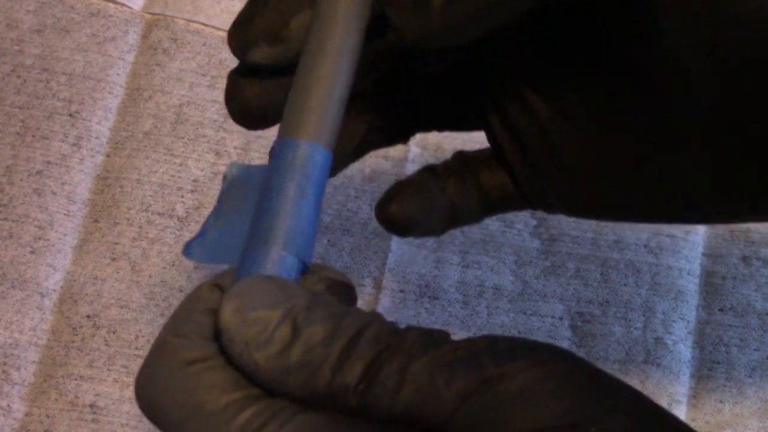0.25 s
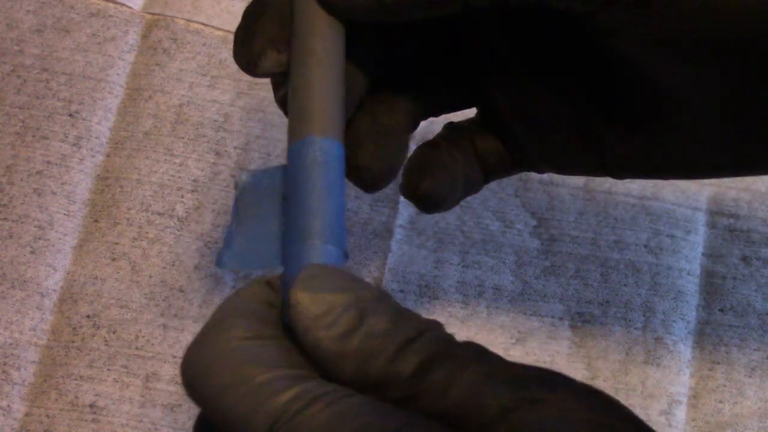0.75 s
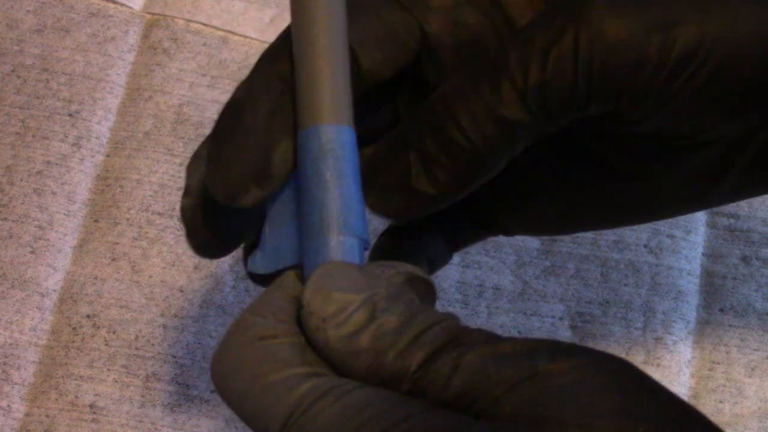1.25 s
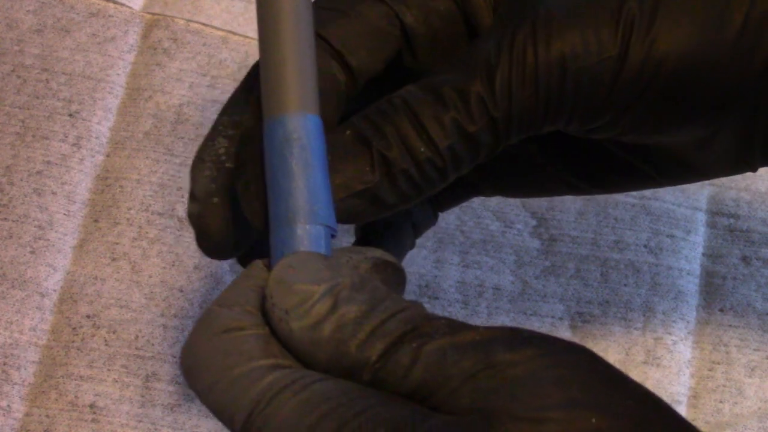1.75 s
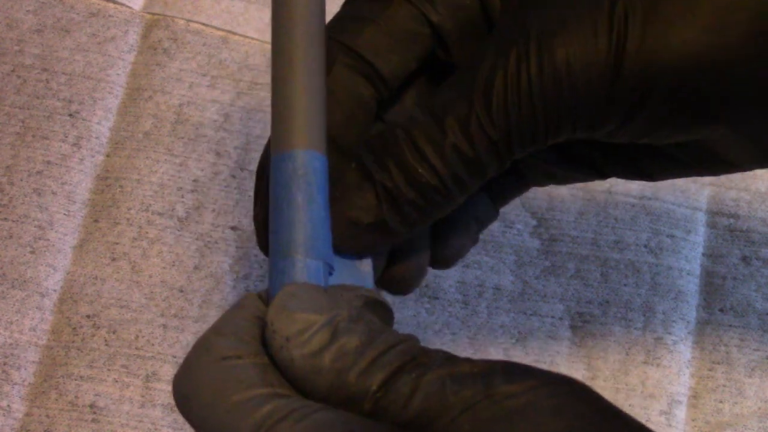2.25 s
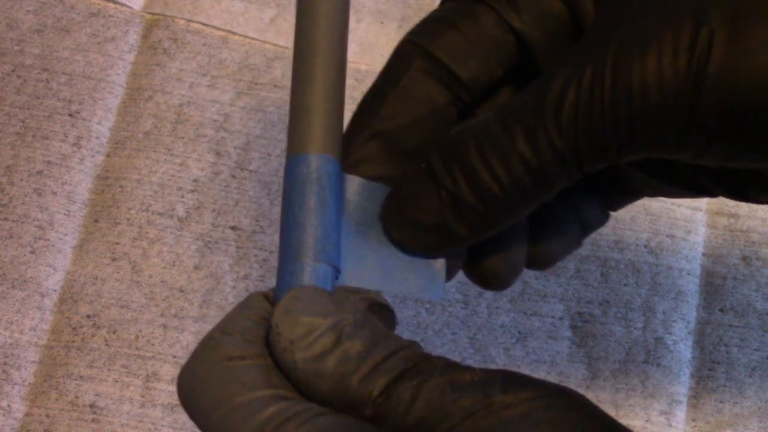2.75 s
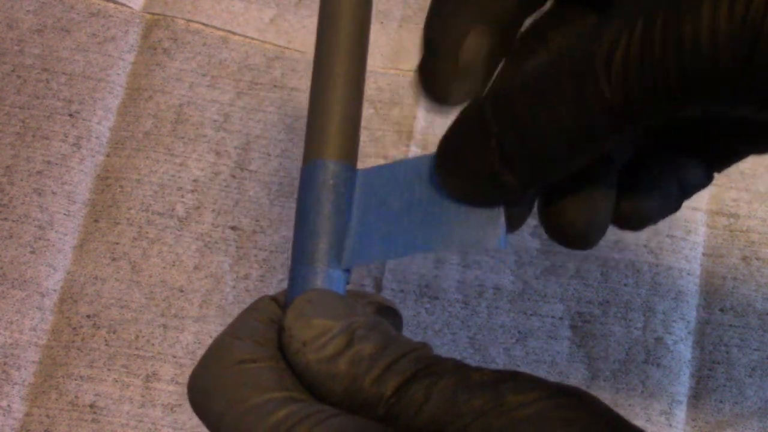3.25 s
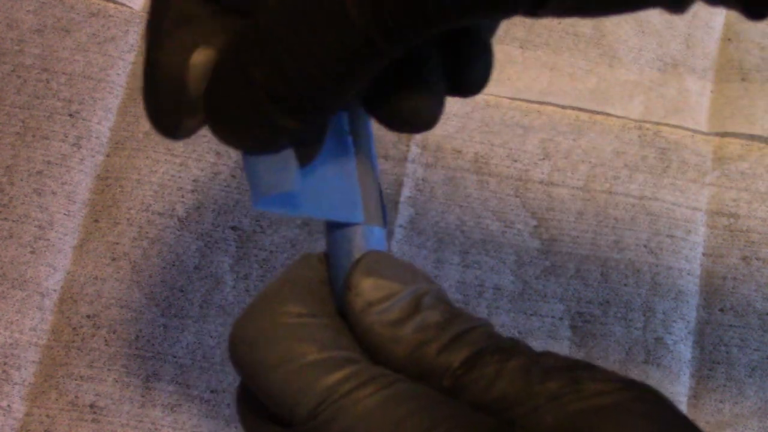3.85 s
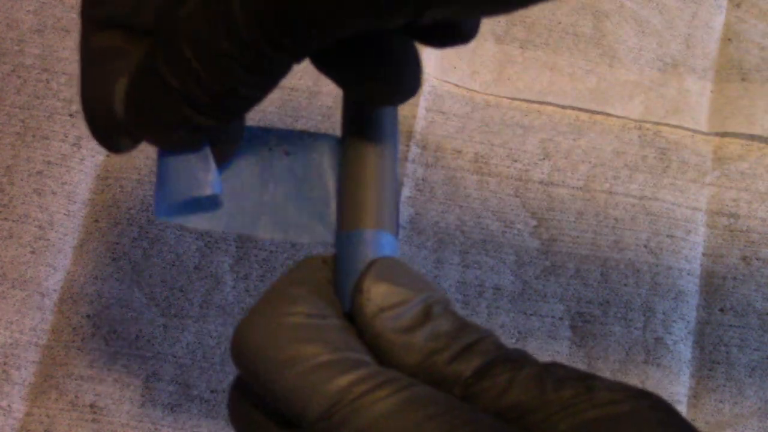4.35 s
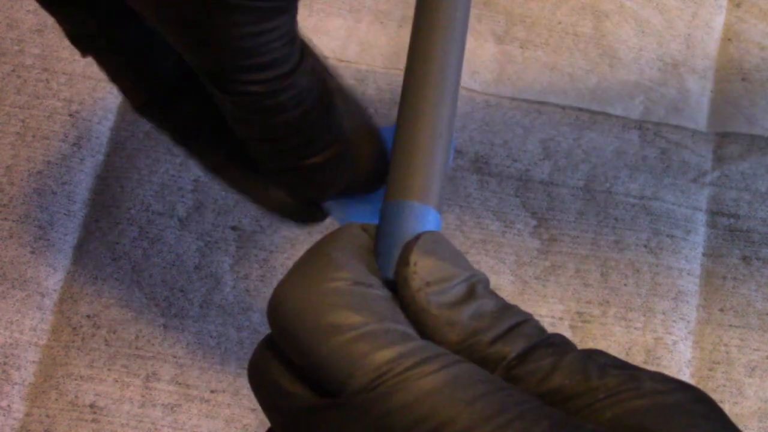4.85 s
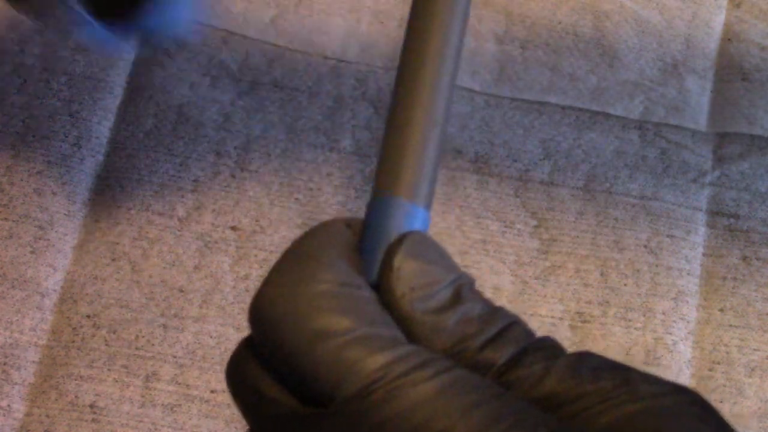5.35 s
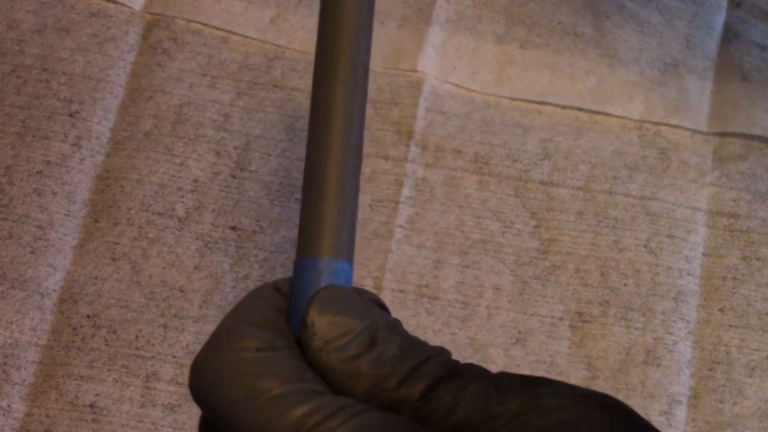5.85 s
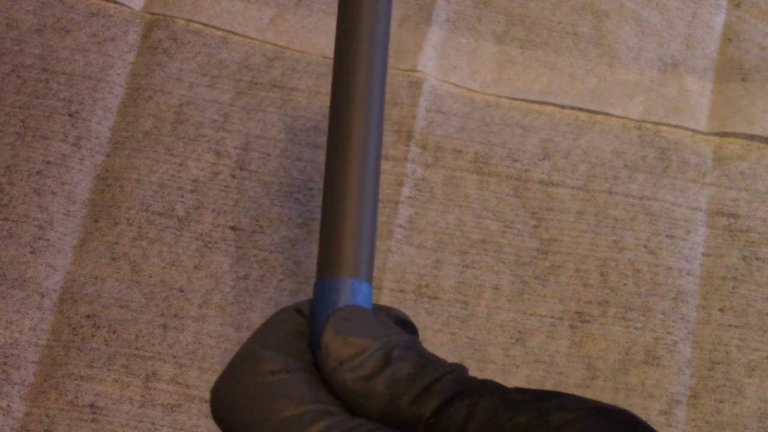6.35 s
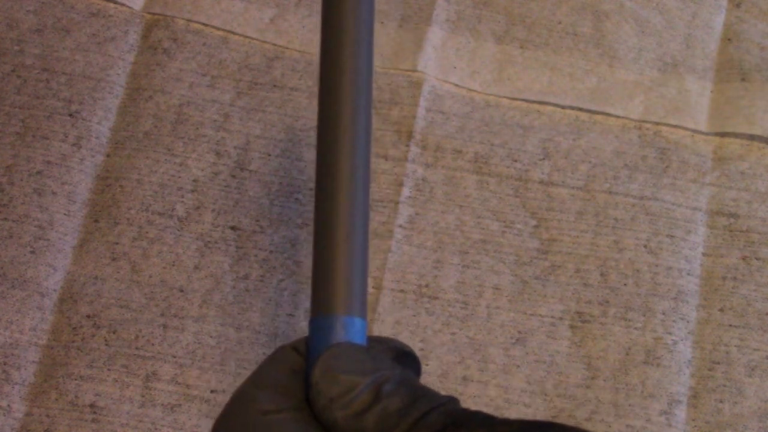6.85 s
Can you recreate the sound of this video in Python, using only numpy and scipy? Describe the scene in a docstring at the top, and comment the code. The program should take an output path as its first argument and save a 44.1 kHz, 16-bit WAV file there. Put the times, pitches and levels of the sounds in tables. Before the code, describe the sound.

Very close handling in a small, dry indoor space: gloves brush lightly, then adhesive paper tape peels in brief dry rips of tiny glue pops, punctuated by bright clicks. The strongest snaps come as it comes loose, followed by crinkles and a few isolated cracks. Late soft rubbing and low bumps end it. Quiet ventilation rushes steadily underneath, with a faint hum.

```python
"""Steady ventilation noise and rustling gloves, then painter's tape unwound from a metal rod close by.
Dense tiny glue pops ring the modes of the taut paper strip; it ticks, rips and snaps as it buckles.
It comes free and is crumpled aside with soft bumps; a small dry room answers with a short dense tail.
Pops are random impulses and cracks are splintering kicks, both through resonators; rubs, air and bumps
are filtered grains and noise."""
import sys
import numpy as np
from scipy import signal
from scipy.fft import rfft, irfft
from scipy.io import wavfile
from scipy.ndimage import uniform_filter1d

SR = 44100
rng = np.random.default_rng(int(sys.argv[2]) if len(sys.argv) > 2 else 0)


def dump(signal):
    """Clip the signal to [-1, 1] and save it as 16-bit WAV at the path in sys.argv[1]."""
    limited = np.clip(np.atleast_2d(signal).T, -1, 1)
    pcm = np.round(limited * 32767).astype(np.int16)
    wavfile.write(sys.argv[1], SR, pcm)


N = 313110
TIME = np.arange(N) / SR


def undb(db):
    """Decibels to gain."""
    return 10 ** (np.asarray(db) / 20)


def unit(x):
    """Scale to rms 1."""
    return x / np.sqrt(np.mean(x ** 2) + 1e-20)


def add(track, start_s, sound):
    """Mix a sound into a track, cut at the track's end."""
    start = int(np.clip(start_s * SR, 0, N - 1))
    track[start:start + len(sound)] += sound[:N - start]


def colour(x, points):
    """Shape a spectrum by (Hz, dB) points, joined by straight lines over log frequency."""
    hz, db = np.transpose(points)
    bins_hz = np.maximum(np.fft.rfftfreq(len(x), 1 / SR), 1)
    gain_db = np.interp(np.log(bins_hz), np.log(hz), db)
    return irfft(rfft(x) * undb(gain_db), len(x))


def band(x, lo_hz, hi_hz, order=3):
    """Butterworth band-pass."""
    edges_hz = [lo_hz, min(hi_hz, SR / 2 - 100)]
    return signal.sosfilt(signal.butter(order, edges_hz, "band", fs=SR, output="sos"), x)


def ring(x, hz, q):
    """One damped resonance, gain 1 at its centre."""
    b, a = signal.iirpeak(min(hz, SR / 2 - 1000), max(q, 1), fs=SR)
    return signal.lfilter(b, a, x)


def walk(per_s):
    """Random levels held briefly and smoothed twice; spread near 1."""
    hold = int(SR / per_s)
    steps = np.repeat(rng.standard_normal(N // hold + 1), hold)
    return 1.25 * uniform_filter1d(uniform_filter1d(steps, hold), hold)[:N]


def pops(size, per_s, spread_db):
    """Tiny impulses at random moments, of random sign and very unequal strength."""
    hits = rng.random(size) < per_s / SR
    strength = undb(spread_db * np.clip(rng.standard_normal(size), -2, 2))
    return hits * strength * rng.choice([-1, 1], size)


def crackle(per_s, spread_db):
    """Endless pops, levelled to near-equal energy over every few hundredths of a second."""
    x = pops(N, per_s, spread_db)
    power = np.abs(uniform_filter1d(x ** 2, size=1500))
    return x / np.sqrt(power + 1e-6)


def fracture(splinter_db, splinter_s, size=1024):
    """One sharp release, trailed by a moment of splintering fibres."""
    t = np.arange(size) / SR
    fade = np.exp(-t / splinter_s)
    x = undb(splinter_db) * rng.standard_normal(size) * fade * (1 - fade)
    x[0] = 1
    return x


def ventilation():
    """Steady rush of air with two duct resonances, a low hum and a thin whine."""
    # Air spectrum. Each row: frequency in Hz, relative density in dB.
    air = [(25, -16.5), (60, -12.5), (110, -3), (190, -0.5), (400, 1), (800, -3.5), (1250, -7.5),
           (2000, -8.5), (3000, -12), (5000, -16.5), (9500, -21), (15000, -30)]
    # Duct resonances. Each row: centre in Hz, width in Hz, gain in dB.
    duct_modes = [(983, 140, -6.5), (1508, 144, 1.5)]
    # Stereo width of the air. Each row: frequency in Hz, side gain in dB.
    air_side = [(28, -1), (75, -9), (240, -7), (620, -7.5), (1550, -7.5), (5100, -10), (15100, -25)]
    # Faint steady tones. Each row: frequency in Hz, rms level in dB.
    hums = [(184.5, -77.5), (5575, -86.5)]
    rush_db = -60.5
    mid, side = (colour(rng.standard_normal(N), air) for _ in range(2))
    mid = mid + sum(undb(db) * ring(mid, hz, hz / width_hz) for hz, width_hz, db in duct_modes)
    rush = unit(mid) + colour(unit(side), air_side) * np.array([[1], [-1]])
    tones = sum(undb(db) * np.sqrt(2) * np.sin(2 * np.pi * hz * TIME) for hz, db in hums)
    return (rush * undb(rush_db) + tones) * undb([[.4], [-.4]])  # slightly left


def rustle():
    """Gloves and slack tape rub in fine grains; each stroke swells and fades like a bell curve."""
    # Grain spectrum. Each row: frequency in Hz, gain in dB.
    grain_colour = [(1000, -6.5), (2700, -7), (4400, -11), (5500, -8.5), (6500, -3), (8100, -9),
                    (9500, -12), (12500, -14), (16000, -8)]
    # Strokes of glove on rod and loose tape. Each row: middle in seconds, length in seconds (between
    # the 1/e points), treble level in dB, middle band in dB re treble.
    rubs = [(0.177, 0.08, -68, 3), (0.378, 0.027, -67, -10), (0.52, 0.028, -70, -2),
            (0.686, 0.041, -67, -2), (1.035, 0.15, -67.5, -7), (1.277, 0.057, -61, -2),
            (5.04, 0.14, -55.5, -5), (5.262, 0.026, -57, 1), (5.407, 0.075, -61.5, 0.5),
            (5.586, 0.22, -64, -1.5), (5.855, 0.023, -64.5, 6), (6.416, 0.023, -63, -12),
            (6.757, 0.076, -50, -17), (6.837, 0.051, -51.5, -7), (6.973, 0.13, -55, -14),
            (7.01, 0.098, -55.5, 0)]
    grip_db = -74.5  # the gloves never quite stop moving
    grains = colour(crackle(per_s=2000, spread_db=6.5), grain_colour)
    treble = unit(band(grains, 3060, 11700))
    middle = unit(band(grains, 1480, 5900))
    out = (treble + middle) * undb(grip_db + 1.97 * walk(per_s=12))
    for middle_s, length_s, db, middle_db in rubs:
        bell = np.exp(-(2 * (TIME - middle_s) / length_s) ** 2)
        out += undb(db) * bell * (treble + undb(middle_db) * middle)
    return out


def rips():
    """Quick runs of pops swell and die as a patch of tape tears or crumples, or a glove squeaks; each run rings
    one narrow pitch."""
    # Each row: start in seconds, length in seconds, rms level in dB, ring in Hz, ring over crack in dB.
    runs = [(0.979, 0.069, -61, 2730, 20), (2.113, 0.0076, -53, 1400, 37), (3.054, 0.0056, -51, 2660, 16),
            (3.106, 0.025, -49.5, 905, 21), (3.151, .023, -52, 2750, 7), (3.214, 0.033, -56, 6170, 0),
            (3.807, .006, -54.5, 2180, 27), (4.009, 0.0061, -42.5, 1510, 10.5),
            (4.077, 0.018, -47, 9100, 1), (4.135, 0.019, -44, 6300, 15), (4.838, 0.0075, -41, 2570, 4),
            (4.843, 0.035, -49, 7700, 2), (4.879, 0.033, -44.5, 4840, 20), (5.487, 0.031, -49, 1680, 14),
            (5.956, 0.017, -37, 2460, 8.5), (5.971, 0.0074, -40.5, 9250, 4), (6.254, 0.037, -63, 3860, 11),
            (6.724, 0.077, -53.5, 6900, 9), (6.766, 0.0053, -46.5, 1150, 14)]
    out = np.zeros(N)
    for start_s, length_s, db, hz, ring_db in runs:
        size = max(int(length_s * SR), 64)
        run = pops(size, per_s=9400, spread_db=3.5) * signal.windows.tukey(size, .5)
        crack = band(run, 720, 8000, order=2)
        fold = ring(ring(run, hz, q=2.5), hz, q=2.5)
        add(out, start_s, unit(crack + undb(ring_db) * fold) * undb(db))
    return out


def pull(length_s, swell_db):
    """Gain of one pull: a quick attack, a steady swell or sag as the hand moves, a quick release."""
    attack_s, release_s = 0.022, 0.01  # the glue starts to give; the crackle dies when the hand stops
    t = TIME[:SR // 2]
    attack = np.clip(t / attack_s, 0, 1)
    swell = undb(swell_db * (np.clip(t / length_s, 0, 1) - .5))
    release = np.exp(-np.maximum(t - length_s, 0) / release_s)
    return attack * swell * release


def peel():
    """Glue pops ring the strip; tension shifts weight from body to treble, free length tints each pull."""
    # Resonances of the taut strip. Each row: centre in Hz, width of each of two passes in Hz, gain in dB.
    strip_modes = [(910, 480, -10.5), (1540, 400, -2), (2535, 640, 8), (3580, 1070, 2.5), (4680, 410, 3),
                   (6060, 1470, 1.5), (7500, 1150, -3.5), (9500, 3800, 0.5), (14400, 3700, -11)]
    # Pulls on the strip. Each row: start in seconds, length in seconds, treble halfway in dB, swell from
    # start to end in dB, slack as body in dB re treble, ring of the free length in Hz.
    hand_pulls = [(2.07, 0.13, -74, -1, 11, 6200), (2.248, 0.19, -60.5, -1, -4, 6100),
                  (2.477, .27, -65.5, 8, 7.5, 6700), (2.729, 0.32, -62, 7.5, -10, 8500),
                  (3.033, 0.074, -53.5, 11, -2.5, 8400), (3.123, 0.18, -59.5, 2, -3, 6200),
                  (3.32, .17, -63.5, 1, -7, 10400), (3.499, 0.069, -61.5, 0, -0.5, 6000),
                  (3.59, 0.35, -73, -7, 4, 9600), (3.929, .13, -58, 8.5, 0, 9300),
                  (4.062, 0.082, -51.5, -1, -6.5, 9350), (4.175, 0.12, -64, 5, -4, 9000),
                  (4.375, 0.12, -63, 6, -6.5, 6200), (4.544, 0.33, -62.5, 4, -4, 6200)]
    middle_base_db, middle_per_slack = 2, 0.7  # middle re treble, and its dB per dB of slack
    free_length_db, free_length_q = 1, 6.6
    glue = crackle(per_s=1900, spread_db=7.5) * undb(2.0 * walk(per_s=140))
    strip = np.zeros(N)
    for hz, width_hz, db in strip_modes:
        # each pop sits on a crest or a trough of this mode; the creeping peel line favours modes in turn
        push = glue * rng.choice([-1, 1], N) * undb(1.6 * walk(per_s=22))
        q = hz / width_hz
        strip += undb(db) * ring(ring(push, hz, q), hz, q)
    bands = np.array([unit(band(strip, 5260, 17000)), unit(band(strip, 1720, 4300)),
                      unit(band(strip, 500, 1750))])
    out = np.zeros(N)
    for start_s, length_s, db, swell_db, slack_db, hz in hand_pulls:
        gain = undb(db) * pull(length_s, swell_db)
        treble, middle, body = bands[:, int(start_s * SR):][:, :len(gain)]
        treble = unit(treble + undb(free_length_db) * ring(treble, hz, free_length_q))
        middle_db = middle_base_db + middle_per_slack * slack_db
        add(out, start_s, gain * (treble + undb(middle_db) * middle + undb(slack_db) * body))
    return out


def ticks():
    """Single glue threads and creases break in small splintering cracks that ring one crease."""
    # Each row: start in seconds, peak level in dB, ring in Hz, ring over crack in dB.
    cracks = [(2.171, -40, 2900, 9), (2.376, -37, 2520, 14), (2.698, -47, 2700, 7), (2.741, -36, 4690, 12),
              (2.761, -39, 4800, 4), (2.933, -38, 7930, 3), (2.9595, -39, 3590, 4), (2.976, -34, 7060, 12),
              (3.296, -33.5, 6750, 12), (3.397, -33, 9700, 17), (3.779, -39, 1500, 34),
              (4.082, -28, 9000, 23), (4.109, -29, 8700, 23), (4.175, -30.5, 8750, 6),
              (4.196, -40, 8800, 9), (4.28, -42, 3370, 9), (4.2895, -36, 3470, 12), (4.3409, -36, 3520, 12),
              (4.581, -43.5, 2750, 19), (5.051, -35, 5560, 7), (5.264, -45, 1920, 6),
              (5.477, -33.5, 6840, -2), (6.408, -38.5, 2700, 9), (6.9346, -31.5, 7350, 23)]
    out = np.zeros(N)
    for start_s, db, hz, ring_db in cracks:
        kick = fracture(splinter_db=-5, splinter_s=.0009)
        sound = band(kick, 2600, 9300, order=2) + undb(ring_db) * ring(kick, hz, q=5.4)
        add(out, start_s, sound / np.abs(sound).max() * undb(db))
    return out


def snaps():
    """The strip buckles loudly and rings in three modes: direct sound, and what goes into the room."""
    # Each row: start in seconds, low mode in Hz, its gain in dB, middle mode in Hz, its gain in dB,
    # high mode in Hz, its gain in dB, room send in dB.
    buckles = [ (2.2887, 2530, -11.5, 3650, -8, 9050, -18, 3),
               (3.0032, 2900, -5.5, 3450, -19, 7300, -20, -8), (3.105, 1540, 8.5, 2600, 7, 7600, -2.5, -9),
               (3.1056, 900, 6, 1470, -3, 6160, -8, -13), (4.1501, 3450, -3, 6140, -11, 10200, -5, -7),
               (4.867, 3200, -4, 7240, -4, 9700, 3, 4.5), (4.8714, 2490, -5, 5700, -15, 9700, -4, 8),
               (4.8791, 1350, 7, 3380, 8, 6370, 7, -2.5), (5.073, 1370, 0.5, 3000, 1, 6000, 7.5, -4),
               (5.4168, 910, 2.5, 3060, 1, 11200, -8.5, -5), (5.4911, 630, -5.5, 2010, -3, 3280, -4.5, 3.5),
               (5.953, 706, -10.5, 5430, -7, 9300, -2.5, -12), (5.9546, 3270, -6, 7000, -0.5, 9400, -5, 0),
               (6.9915, 1460, -12.5, 3700, -36, 7100, 5.5, -8.5)]
    crack_db = -17.5  # thin top edge of every snap, re the high mode
    direct, spill = np.zeros(N), np.zeros(N)
    for start_s, low_hz, low_db, middle_hz, middle_db, high_hz, high_db, room_db in buckles:
        kick = fracture(splinter_db=-11, splinter_s=0.00094)
        low = undb(low_db) * ring(kick, low_hz, q=1.97)
        middle = undb(middle_db) * ring(kick, middle_hz, q=3.33)
        high = undb(high_db) * ring(kick, high_hz, q=3.7)
        sound = band(low - middle + high, 130, 9800, order=2)
        edge = undb(high_db + crack_db) * ring(kick, 14800, q=13)
        add(direct, start_s, sound + edge)
        add(spill, start_s, sound * undb(room_db))
    return direct, spill


def bumps():
    """Hands, rod and slackening tape knock softly: octave-wide noise that fades quickly."""
    # Each row: start in seconds, noise rms before the fade in dB, centre in Hz, decay time in seconds.
    knocks = [(3.166, -61, 367, 0.12), (4.074, -47.5, 375, 0.031), (4.118, -52.5, 312, 0.047),
              (4.874, -33, 503, 0.0093), (5.07, -40.5, 436, 0.0086), (5.955, -60, 404, 0.03),
              (6.865, -52, 156, 0.037), (6.992, -49.5, 190, 0.024), (7.008, -58, 586, .06)]
    out = np.zeros(N)
    t = TIME[:SR // 3]
    for start_s, db, hz, decay_s in knocks:
        thud = unit(band(rng.standard_normal(len(t)), hz / 1.42, hz * 1.41, order=3))
        envelope = np.exp(-t / decay_s) * (1 - np.exp(-t / 0.00033))
        add(out, start_s, thud * undb(db) * envelope)
    return out


def room(x, t60_s, onset_s, side_db):
    """Bench and walls answer after a few milliseconds with a short dense tail, nearly alike in both ears."""
    walls = [(210, 9.5), (950, -9.5), (3100, -6.5), (6100, -5.5), (10100, -10.5), (16100, -11)]  # (Hz, dB)
    t = TIME[:SR // 2]
    fade = (t > onset_s) * undb(-60 * t / t60_s)
    fade = fade / np.linalg.norm(fade)
    tails = [colour(rng.standard_normal(len(t)) * fade, walls) for _ in range(2)]
    mid, side = (signal.fftconvolve(x, tail)[:N] for tail in tails)
    return mid + undb(side_db) * side * np.array([[1], [-1]])


def microphones(x, lag_s):
    """Two close ports: levels follow the working hand; the right one hears it a hair earlier."""
    # Where the working hand is. Each row: time in seconds, left minus right in dB.
    place = [(3, 2), (4.9, 0), (5.4, 1), (5.96, -1.3), (7, -2)]
    place_s, left_right_db = np.transpose(place)
    pan_db = np.interp(TIME, place_s, left_right_db)
    hz = np.fft.rfftfreq(N, 1 / SR)
    late = irfft(rfft(x) * np.exp(-2j * np.pi * hz * lag_s), N)
    return np.array([late * undb(pan_db / 2), x * undb(-pan_db / 2)])


def scene():
    """Mix close handling, its room tail and the ventilation; the handling ends a little to the right."""
    direct, spill = snaps()
    small = peel() + rustle() + ticks() + rips()
    echo = room(spill + undb(-2.5) * small, t60_s=0.19, onset_s=0.005, side_db=-19.0)
    close = microphones(direct + small + bumps(), lag_s=.000004)
    return close + echo + ventilation()


def record(dry):
    """The recorder cuts the top with a steep elliptic low-pass."""
    top_hz = 15800
    return signal.sosfilt(signal.ellip(8, .2, 70, top_hz, fs=SR, output="sos"), dry)


dry = scene()
out = record(dry)
dump(out)
```